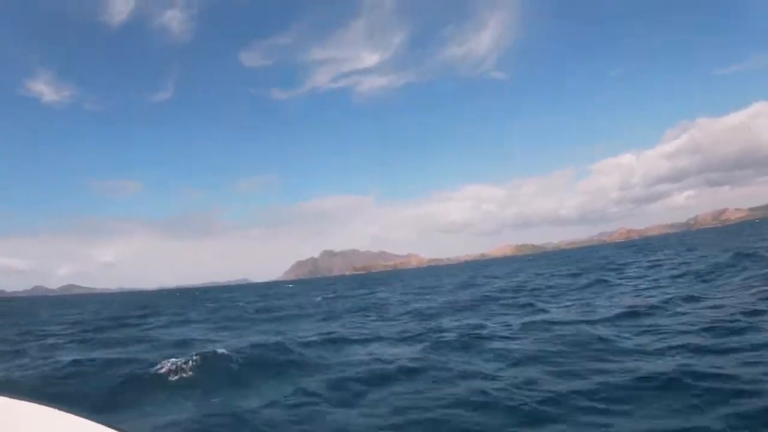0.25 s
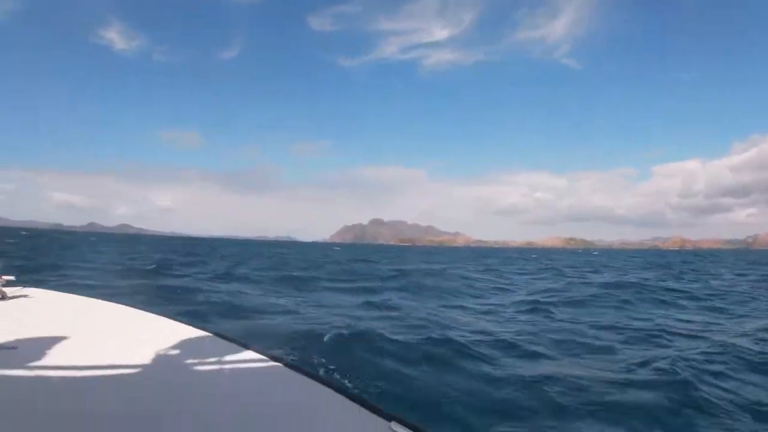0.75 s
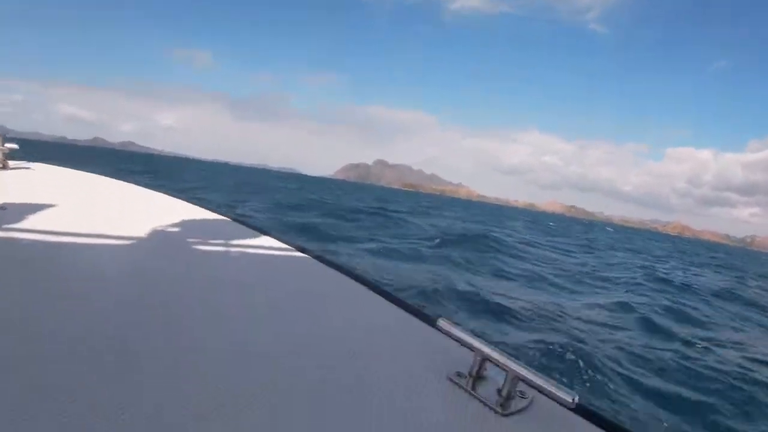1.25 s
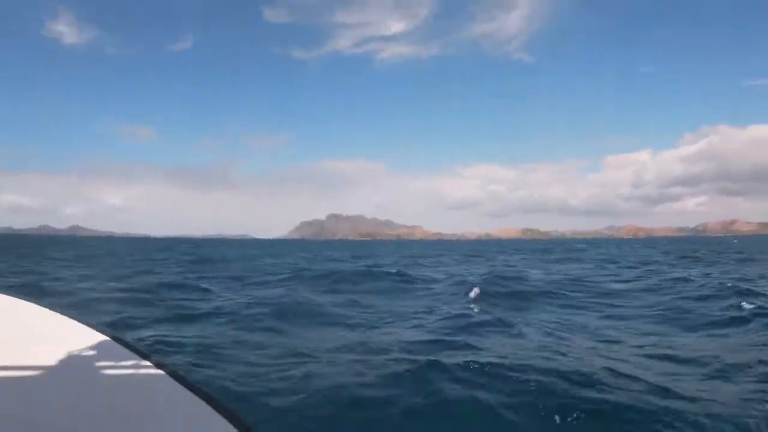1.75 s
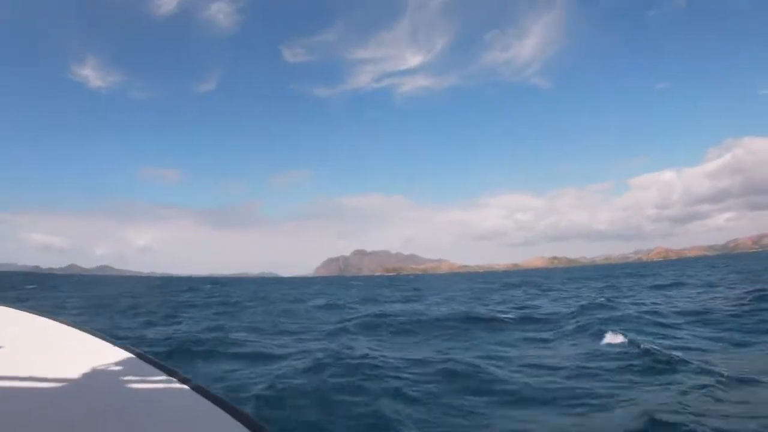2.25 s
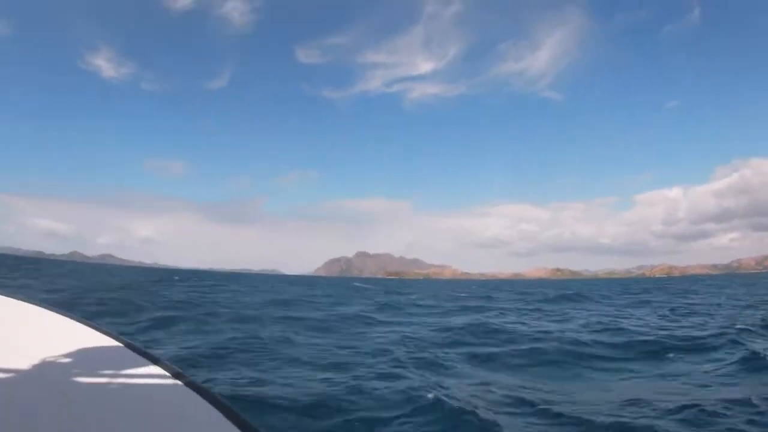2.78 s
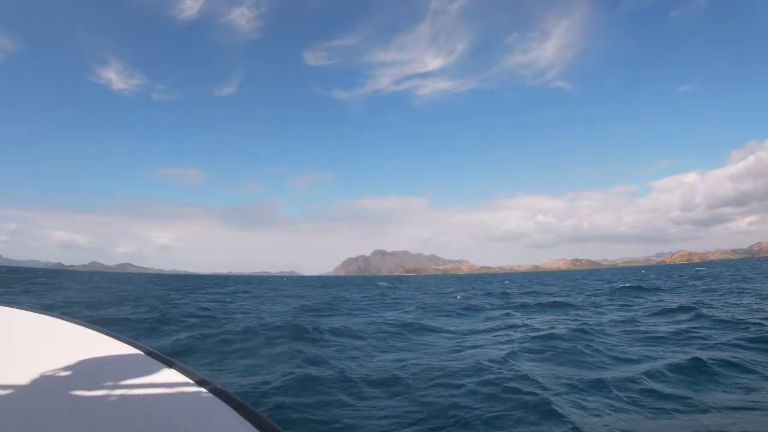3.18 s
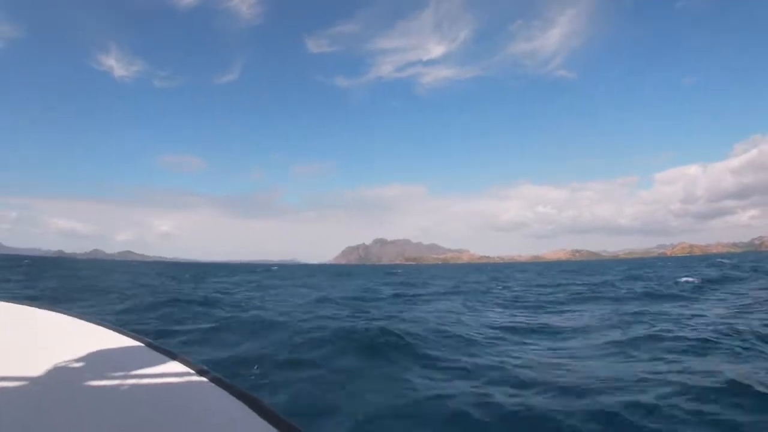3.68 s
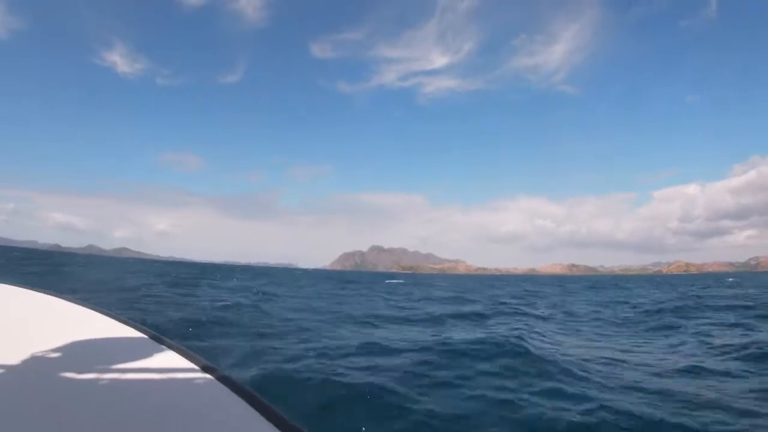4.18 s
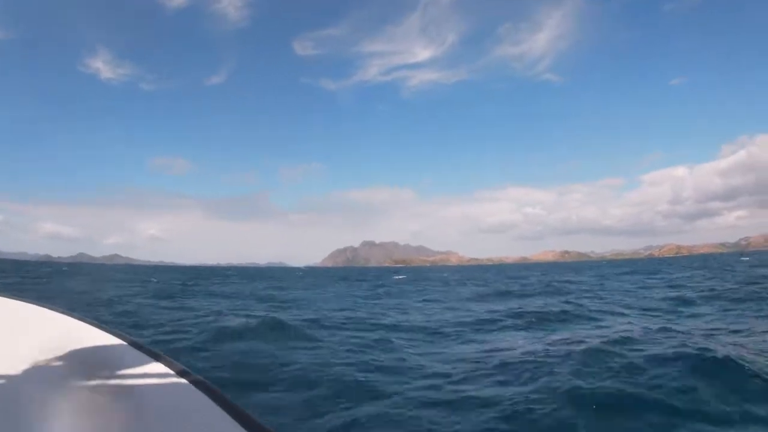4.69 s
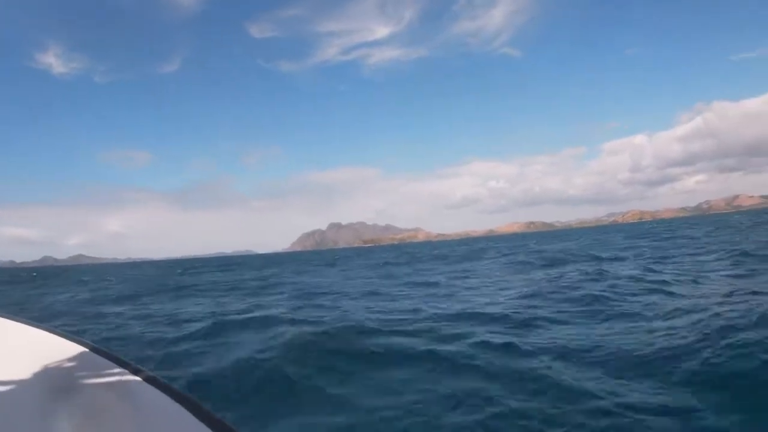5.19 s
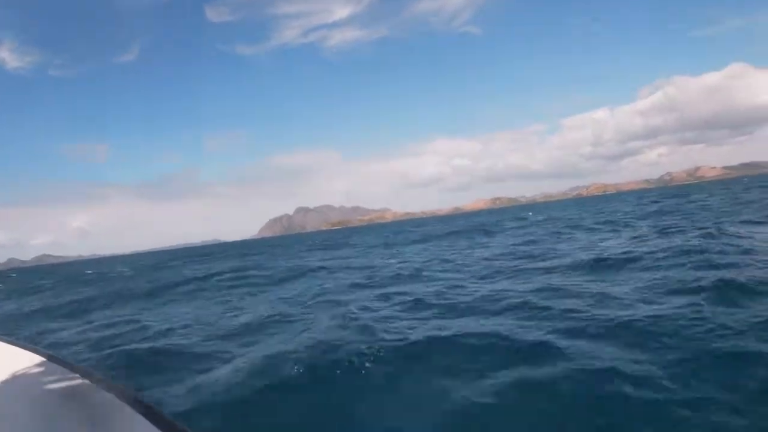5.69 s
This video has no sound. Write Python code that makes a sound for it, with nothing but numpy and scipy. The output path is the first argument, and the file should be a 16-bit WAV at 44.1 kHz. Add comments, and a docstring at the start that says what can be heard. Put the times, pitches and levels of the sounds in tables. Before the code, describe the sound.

Onboard a cruising motorboat: a loud humming engine drone, gusty wind buffeting the microphone, and soft hissing bow-wave surges with fine spray.

```python
"""On board a small motorboat cruising over a choppy sea.
Engine: sines locked to one crank angle, a drone at the firing rate over the propeller's beat and a gear
whine; it slows as the hull climbs each wave.
Wind: shaped noise thumps, rumbles and flutters on the microphone in gusts and single buffets.
Water: noise rushes in bow-wave surges with droplet spray, over a steady wake; a limiter ducks the peaks."""
import sys
import numpy as np
from scipy import signal
from scipy.fft import rfft, irfft, next_fast_len
from scipy.io import wavfile
from scipy.ndimage import uniform_filter1d

SR = 44100
rng = np.random.default_rng(int(sys.argv[2]) if len(sys.argv) > 2 else 0)


def unload_audio(sound):
    """Save the sound as a 16-bit wav file, at the path given as the first command line argument."""
    columns = np.transpose(np.atleast_2d(sound))
    # keep every value between -1 and 1, then stretch to whole-number steps
    steps = np.round(np.clip(columns, -1, 1) * 32767)
    wavfile.write(sys.argv[1], SR, steps.astype(np.int16))


N = 261946
TIME_S = np.arange(N) / SR


def amp(level_db):
    """Decibels to amplitude gain."""
    return 10 ** (np.asarray(level_db) / 20)


def evened(x):
    """Scales to rms 1."""
    return x / np.sqrt(np.mean(x ** 2) + 1e-20)


def curves(table):
    """Interpolates each column of a table over time; the first column is t/s."""
    t_s, *columns = np.transpose(table)
    return [np.interp(TIME_S, t_s, column) for column in columns]


def noise():
    """White Gaussian noise."""
    return rng.standard_normal(N)


def wander(cutoff_hz):
    """Smooth random curve of rms 1: noise on a coarse time grid, rolled off above the cutoff."""
    step = 64  # samples per grid point
    size = N // step + 2
    f_hz = np.fft.rfftfreq(size, step / SR)
    rolloff = np.sqrt(1 + (f_hz / cutoff_hz) ** 6)
    slow = irfft(rfft(rng.standard_normal(size)) / rolloff, size)
    return evened(np.interp(np.arange(N) / step, np.arange(size), slow))


def coloured(x, spectrum):
    """Filters x by a (f/Hz, level/dB) spectrum, interpolated over log f; rms 1."""
    table_hz, table_db = np.transpose(spectrum)
    size = next_fast_len(N)
    f_hz = np.fft.rfftfreq(size, 1 / SR)
    gain = amp(np.interp(np.log(f_hz + 1), np.log(table_hz), table_db))
    return evened(irfft(rfft(x, size) * gain, size)[:N])


def steadied(x, span_s=0.07):
    """Divides a noise by its running rms, so its chance swells do not add to the set level."""
    power = uniform_filter1d(x ** 2, size=int(span_s * SR))
    return x / np.sqrt(abs(power) + 1e-3)


def swell(crest_s, length_s, rise=0.43):
    """Bell in time, length_s between its 1/e points; rise is the share before the crest."""
    side_s = length_s * np.where(TIME_S < crest_s, rise, 1 - rise)
    return np.exp(-((TIME_S - crest_s) / side_s) ** 2)


# engine speed: t/s, firing rate f/Hz
FIRING_RATE = [(0, 161), (.45, 163), (.8, 162.6), (1.9, 164.4), (2.35, 159.6), (2.8, 160.8), (3.22, 157.4),
               (3.73, 162.3), (4.2, 160.7), (4.48, 165.4), (5, 167.7), (5.94, 166)]
# gear whine: t/s, mesh level/dB, octave level/dB
GEAR_WHINE = [(0, -37, -56), (.55, -46, -55), (.85, -36, -48.5), (1.08, -43, -66), (1.7, -41, -51.5),
              (2.28, -35, -59), (2.7, -43, -46), (3.05, -40.5, -60), (3.72, -38, -46.5), (4.03, -39, -59),
              (4.65, -40.5, -53.5), (5.2, -50, -44.5), (5.55, -44.5, -48.5), (5.94, -50, -44)]
# weak engine orders: multiple of the firing rate, level/dB
ENGINE_ORDERS = [(0.498, -37.5), (1.251, -38.5), (1.75, -51.5), (2, -48.5), (2.5, -46.5), (3, -51),
                 (3.5, -51)]
CRUISE_HZ = 162  # firing rate at which the line levels below hold, between gusts
DRONE_DB, PROP_DB, SIDEBAND_DB = -11, -28, -51
PROP_DB_PER_HZ, SIDEBAND_DB_PER_HZ = 0.85, 1.5  # growth per Hz of firing rate
PROP_GUST_SHARE = 0.5  # share of the eddies' rise in dB that the propeller's beat follows


def engine(dip_db, gust_db, jitter=0.0017, throb=0.052, waver_db=1.0, rattle=0.41):
    """Every line is locked to the crankshaft; uneven firing makes the weak ones rough."""
    firing_hz, = curves(FIRING_RATE)
    mesh_db, octave_db = curves(GEAR_WHINE)
    faster_hz = firing_hz - CRUISE_HZ
    uneven_hz = firing_hz * (1 + jitter * wander(36))
    angle = 2 * np.pi * np.cumsum(uneven_hz) / SR  # one cycle per firing

    drone_gain = amp(DRONE_DB - dip_db + waver_db * wander(11))
    drone = drone_gain * np.sin(angle) * (1 + throb * wander(30))

    # behind the reduction gear, three blades pass in five firings
    prop_db = PROP_DB + PROP_DB_PER_HZ * faster_hz + PROP_GUST_SHARE * gust_db
    propeller = amp(prop_db) * np.sin(angle * 3 / 5)

    mesh = amp(mesh_db) * np.sin(5 * angle) * (1 + 0.39 * wander(41))
    octave = amp(octave_db) * np.sin(10 * angle) * (1 + 0.24 * wander(16))
    # one crank turn below the mesh
    sideband_db = SIDEBAND_DB + SIDEBAND_DB_PER_HZ * faster_hz
    sideband = amp(sideband_db) * np.sin(4.5 * angle) * (1 + 0.37 * wander(17))

    orders = np.zeros(N)
    for multiple, level_db in ENGINE_ORDERS:
        phase = 2 * np.pi * rng.random()
        orders += amp(level_db) * np.sin(multiple * angle + phase) * (1 + rattle * wander(8.2))
    return drone + propeller + mesh + octave + sideband + orders


# gusts across the microphone: crest t/s, length/s, dip of the drone/dB, rise of the eddies/dB
WIND_GUSTS = [(0.12, 0.37, 0.8, 9), (0.467, 0.3, 7, 14.5), (1.726, 0.27, 3, 9.4), (1.994, 0.21, 8, 7.5),
              (2.324, 0.29, 4.5, 5.5), (2.696, 0.29, 9, 10), (3.577, 0.44, 5, 11), (4.09, 0.17, 6.5, 2),
              (4.41, 0.58, -0.5, 5.7), (4.893, 0.24, 6, 6.5), (5.491, 0.68, 2, 6.4), (5.888, 0.45, 9.5, 6)]


def gusts():
    """Overlapping gusts add up in dB: how far the drone dips and the eddies rise."""
    dip_db, gust_db = np.zeros(N), np.zeros(N)
    for crest_s, length_s, drone_dip_db, eddy_rise_db in WIND_GUSTS:
        bell = swell(crest_s, length_s)
        dip_db += drone_dip_db * bell
        gust_db += eddy_rise_db * bell
    return dip_db, gust_db


# finer wind noise: t/s, rumble level/dB before rumble_gain_db, flutter level/dB; puffs vary both
TURBULENCE_LEVELS = [(0.0, -44, -31), (0.42, -33, -29.5), (0.65, -31.5, -35), (1.33, -31.5, -40),
                     (1.76, -29.5, -37), (2.09, -37.5, -38.5), (2.3, -27.5, -38), (2.68, -29.5, -35),
                     (2.92, -35, -37.5), (3.2, -37, -38), (3.4, -31, -31.5), (3.9, -27.5, -33.5),
                     (4.14, -32.5, -35.7), (4.32, -29.5, -33), (4.75, -30.5, -36.3), (5.03, -38, -40.5),
                     (5.47, -31, -32.9), (5.94, -33.5, -30.5)]
# relative spectra: f/Hz, level/dB (per Hz)
EDDY_SPECTRUM = [(8, -23), (22, -4), (50, -2.5), (76, -1.5), (92, -2), (110, -7), (140, -4), (200, -27),
                 (400, -47.5), (900, -79.5)]
RUMBLE_SPECTRUM = [(60, -24), (110, -9), (128, 3), (180, -2), (203, 1.5), (228, -7), (255, -16), (400, -29),
                   (900, -71.5)]
FLUTTER_SPECTRUM = [(100, -0.5), (200, -2.5), (300, 1), (450, -2), (700, -9), (1000, -18), (1600, -23),
                    (3000, -42), (8000, -72)]
EDDY_DB = -31  # between gusts


def wind(gust_db, rumble_gain_db=6.0, lumpy_db=2.0, puffy_db=2.14):
    """Eddies thump the microphone in each gust; finer turbulence rumbles and flutters in quick lumps."""
    rumble_db, flutter_db = curves(TURBULENCE_LEVELS)
    puffs = amp(puffy_db * wander(8))
    eddies = amp(EDDY_DB + gust_db) * steadied(coloured(noise(), EDDY_SPECTRUM))
    rumble = amp(rumble_db + rumble_gain_db) * steadied(coloured(noise(), RUMBLE_SPECTRUM))
    lumps = amp(lumpy_db * wander(84))
    flutter = amp(flutter_db) * steadied(coloured(noise(), FLUTTER_SPECTRUM) * lumps)
    return eddies + puffs * (rumble + flutter)


# sudden buffets: crest t/s, peak level/dB before gain_db, length/s, centre f/Hz
WIND_BUFFETS = [(0.386, -11.5, 0.11, 76), (0.496, -27.5, 0.039, 500), (0.522, -15, 0.054, 61.5),
                (1.698, -19, 0.047, 60), (1.795, -30.5, 0.057, 750), (1.873, -25, 0.01, 700),
                (2.006, -25, .015, 420), (2.273, -28.5, 0.063, 600), (2.329, -21.5, 0.041, 200),
                (2.524, -14.5, 0.039, 213), (2.535, -23.5, 0.022, 596.5), (2.707, -14, 0.017, 247),
                (2.736, -25.5, 0.025, 470), (3.43, -23, .027, 400), (3.463, -12.5, 0.05, 105),
                (3.79, -26, 0.036, 600), (3.907, -25.5, 0.053, 620), (4.336, -16, 0.028, 205.6),
                (4.475, -23.5, 0.016, 360), (4.781, -22, 0.005, 750), (4.801, -24, 0.028, 567),
                (5.345, -26.5, 0.035, 550), (5.474, -24.5, 0.058, 480), (5.768, -27, 0.018, 620)]
# relative buffet spectrum: multiple of the centre f, level/dB (per Hz)
BUFFET_SPECTRUM = [(.15, -11), (.5, -2), (1, 2.5), (1.4, -3.5), (2.2, -19.5), (8, -71)]


def buffets(gain_db=1):
    """Single eddies break on the microphone: bursts of uneven pressure swings, slower for a larger eddy."""
    out = np.zeros(N)
    for crest_s, peak_db, length_s, centre_hz in WIND_BUFFETS:
        bell = swell(crest_s, length_s)
        spectrum = [(centre_hz * multiple, level_db) for multiple, level_db in BUFFET_SPECTRUM]
        burst = bell * coloured(noise(), spectrum)
        # energy of a unit sine under the same bell
        unit_gain = np.sqrt(np.sum(bell ** 2) / np.sum(2 * burst ** 2))
        out += amp(peak_db + gain_db) * burst * unit_gain
    return out


def drops(per_s, spread_db):
    """Random train of droplet impacts of either sign, a few of them large; rms 1."""
    size = amp(spread_db * np.minimum(rng.exponential(1, N), 5))
    sign = np.sign(noise())
    return evened(size * sign * (rng.random(N) < per_s / SR))


# bow-wave surges: crest t/s, length/s, spray level/dB, rush level/dB, before the gains in water()
BOW_SURGES = [(0.022, 2, -51.5, -55.5), (0.967, .34, -45.5, -40.5), (1.2, 0.27, -49, -49.5),
              (1.482, 0.47, -44.5, -46), (2.242, 0.9, -49.5, -40), (2.942, 0.31, -52.5, -41.5),
              (3.26, 0.91, -52, -44), (3.867, .3, -48.5, -39), (4.24, 0.64, -44, -39),
              (4.586, 0.6, -51, -51), (5.35, 0.9, -49.5, -42), (5.68, .6, -60, -45)]
# relative spectra: f/Hz, level/dB (per Hz)
RUSH_SPECTRUM = [(200, -3.5), (500, 2), (850, 1), (1200, -1), (1650, -3.5), (1900, -7.5), (3000, -10),
                 (4500, -20.5), (6000, -20), (7500, -36.5), (12000, -50.5)]
WAKE_SPECTRUM = [(150, -15), (400, -3.5), (800, -1), (1650, -9), (2000, -11.5), (5000, -23.5),
                 (8000, -50.5)]
SPRAY_SPECTRUM = [(1000, -5.5), (3000, 4.5), (4600, 2), (5900, 4), (6700, -3.5), (7700, -10),
                  (11000, -13.5), (12100, -11.5), (13000, -23.5), (15000, -42)]
SURGE_RISE = 0.41  # share of its length that a surge takes to build
DRIZZLE_DB = -61.5  # spray between surges, before spray_gain_db


def water(rush_gain_db=3.5, spray_gain_db=1.5, wake_db=-39.5, churn_db=0.5, fizz_db=0.82):
    """The bow wave churns over the steady wash of the wake; its spray falls back as dense droplets."""
    spray_power, rush_power = np.full(N, amp(DRIZZLE_DB) ** 2), np.zeros(N)
    for crest_s, length_s, spray_db, rush_db in BOW_SURGES:
        bell = swell(crest_s, length_s, SURGE_RISE)
        spray_power += (amp(spray_db) * bell) ** 2
        rush_power += (amp(rush_db) * bell) ** 2

    churn = amp(rush_gain_db + churn_db * wander(30))
    rush = np.sqrt(rush_power) * churn * coloured(noise(), RUSH_SPECTRUM)
    wake = amp(wake_db) * coloured(noise(), WAKE_SPECTRUM)
    droplets = coloured(noise() + 0.56 * drops(per_s=5000, spread_db=3.5), SPRAY_SPECTRUM)
    fizz = amp(spray_gain_db + fizz_db * wander(25))
    spray = np.sqrt(spray_power) * fizz * droplets
    return rush + wake + spray


def scene():
    """Engine, wind and water summed at one microphone."""
    dip_db, gust_db = gusts()
    mix = engine(dip_db, gust_db) + wind(gust_db) + buffets() + water()
    return mix[None]  # one channel


def record(dry, ceiling_db=-7, recover_db_per_s=120, lowpass_hz=14700):
    """A fast limiter ducks everything under the strongest peaks; then a lowpass limits the band."""
    over_db = np.maximum(20 * np.log10(abs(dry[0]) + 1e-9) - ceiling_db, 0)
    # hold the highest peak so far, less a linear recovery
    recovery_db = TIME_S * recover_db_per_s
    duck_db = np.maximum.accumulate(over_db + recovery_db) - recovery_db
    smooth_db = uniform_filter1d(uniform_filter1d(duck_db, size=64), size=64)
    soft_ends = signal.windows.tukey(N, 0.0005)
    lowpass = signal.firwin(511, lowpass_hz, window=("kaiser", 9), fs=SR)
    return signal.oaconvolve(dry * amp(-smooth_db) * soft_ends, lowpass[None], "same")


dry = scene()
out = record(dry)
unload_audio(out)
```